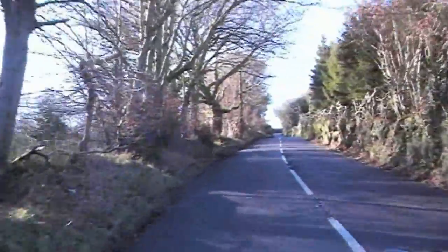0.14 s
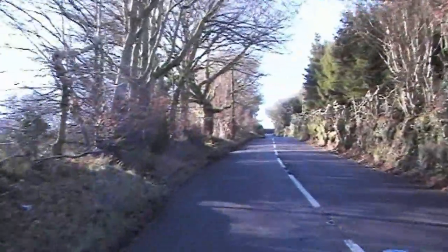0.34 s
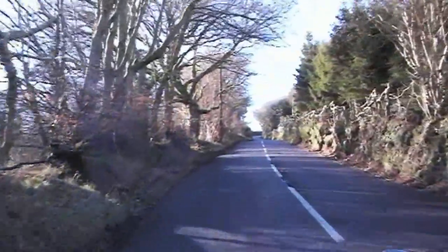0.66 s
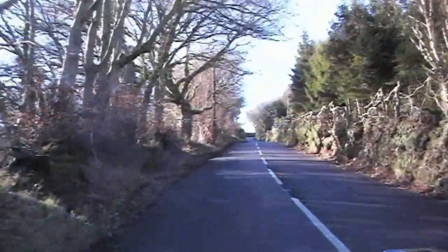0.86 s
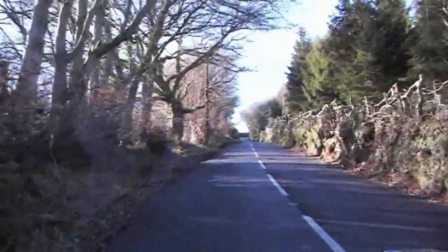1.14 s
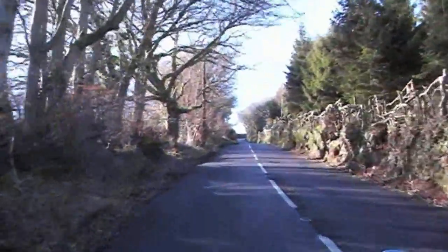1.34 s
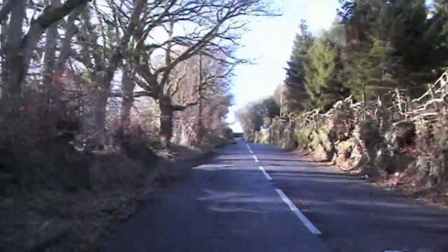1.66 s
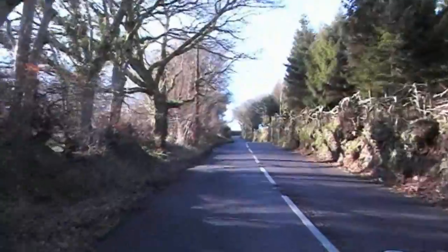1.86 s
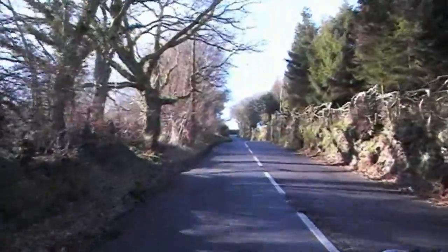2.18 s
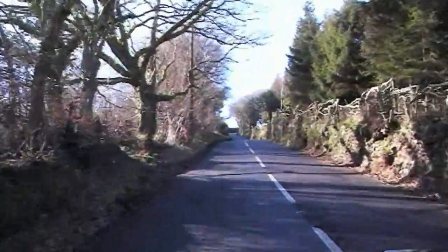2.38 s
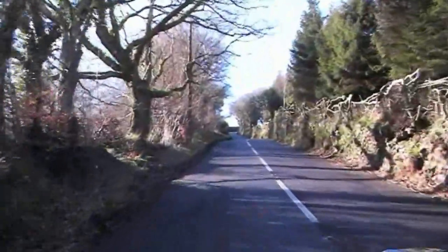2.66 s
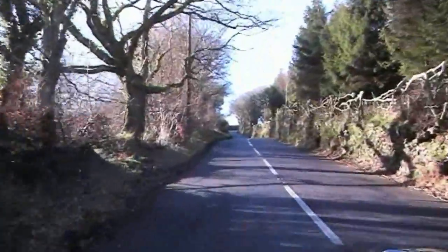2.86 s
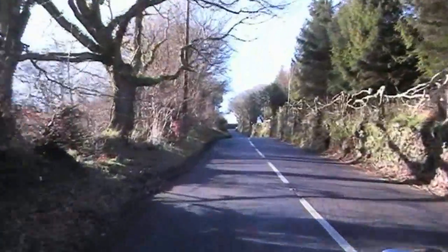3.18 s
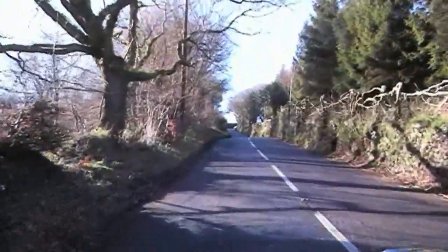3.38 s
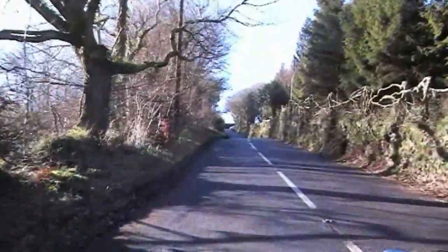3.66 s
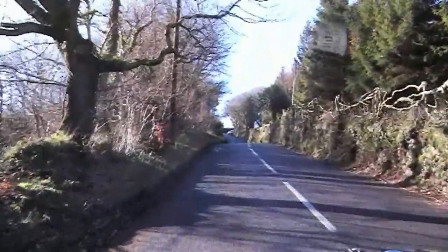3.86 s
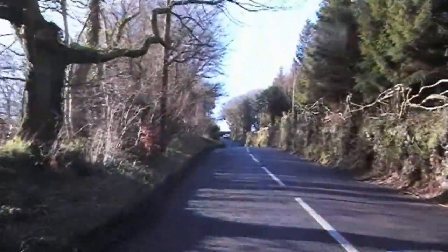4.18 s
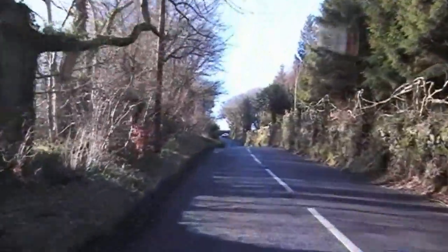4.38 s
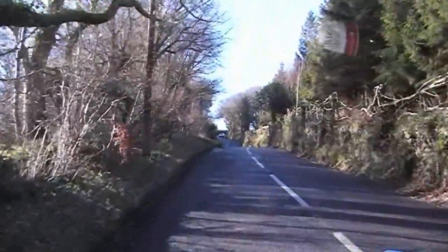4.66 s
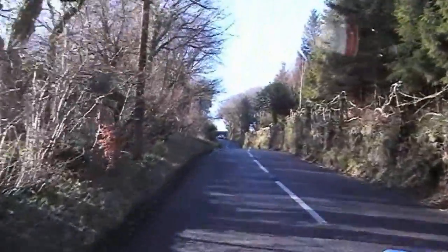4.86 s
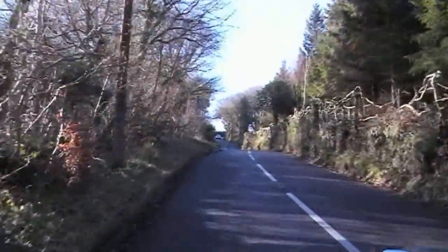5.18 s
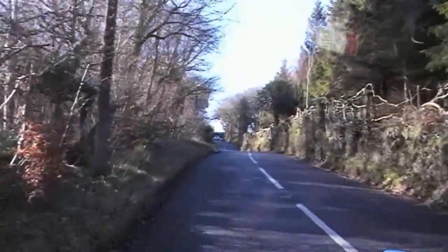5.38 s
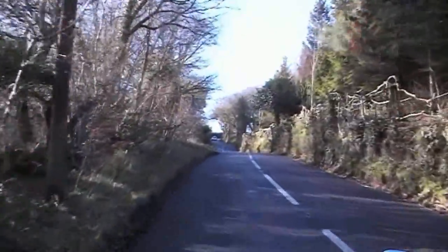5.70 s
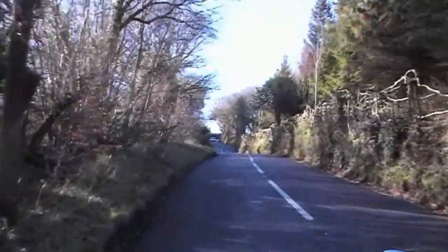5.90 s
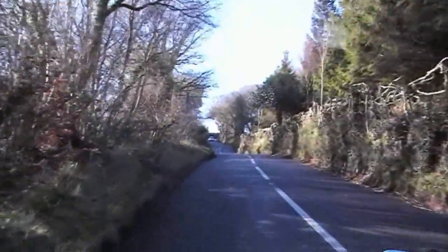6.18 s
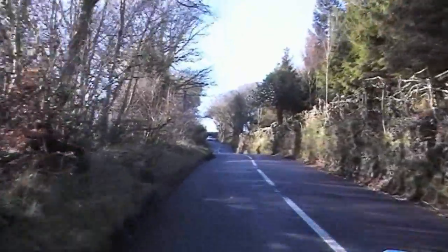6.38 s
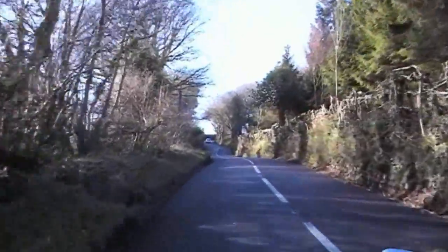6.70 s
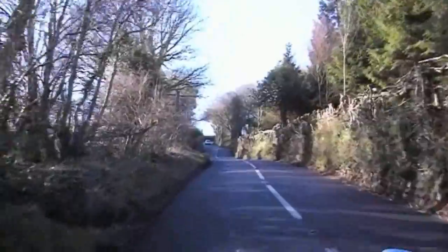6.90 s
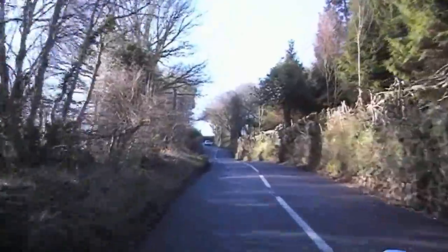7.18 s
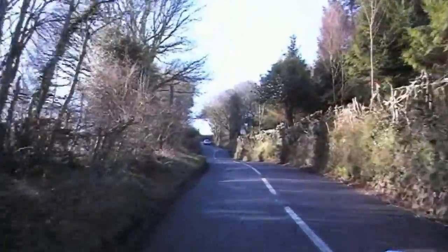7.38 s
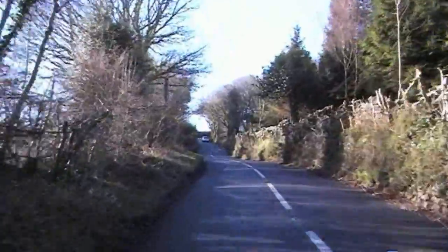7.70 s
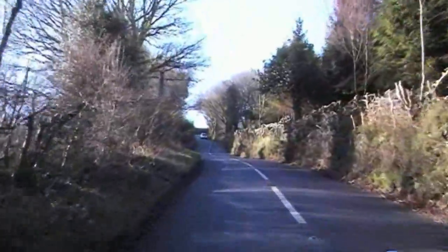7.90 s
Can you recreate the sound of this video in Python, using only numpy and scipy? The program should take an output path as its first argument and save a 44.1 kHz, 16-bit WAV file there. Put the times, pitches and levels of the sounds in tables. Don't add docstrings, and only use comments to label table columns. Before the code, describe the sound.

Inside an off-road vehicle on a country lane, a five-cylinder turbodiesel hums and clatters at steady cruising speed. A thin turbo whistle sinks slightly, then climbs as the engine pulls harder after about five seconds. Tyre roar, wind hiss and low bumps fill the cabin, caught close by a stereo microphone on the dashboard.

```python
import sys
import numpy as np
from scipy import signal
from scipy.fft import rfft, irfft, next_fast_len
from scipy.io import wavfile

SR = 44100
rng = np.random.default_rng(int(sys.argv[2]) if len(sys.argv) > 2 else 0)


def pcm_store(signal):
    levels = np.round(np.clip(np.atleast_2d(signal), -1, 1) * 32767)
    wavfile.write(sys.argv[1], SR, levels.astype(np.int16).T)


def ratio(d):
    e = np.asarray(d, float) / 20
    return 10 ** e


N = 355005

# time in seconds, engine load from 0 to 1.
THROTTLE = [
    (0, .15),
    (.75, .15),
    (1.5, 0),
    (5.15, 0),
    (5.45, .7),
    (6, .9),
    (6.6, 1),
    (8.05, 1),
]
# time in seconds, crank speed in rpm.
CRANK_SPEED = [(0, 2086), (1, 2080), (1.5, 2067), (2, 2052), (2.5, 2046), (3.5, 2048), (4, 2056),
               (4.75, 2043), (5.25, 2060), (5.5, 2071), (5.75, 2096), (6, 2136), (6.25, 2166), (6.5, 2178),
               (7.25, 2268), (7.5, 2288), (7.75, 2328), (8.05, 2359)]
# time in seconds, shaft rate in Hz.
SHAFT_SPEED = [(0, 1783), (.4, 1786), (.8, 1780), (1.6, 1749), (2.2, 1739), (3.3, 1729), (4.4, 1712),
               (4.8, 1722), (5.2, 1745), (5.48, 1790), (5.9, 1904), (6.15, 1954), (6.3, 1980), (6.75, 1999),
               (6.9, 2013), (7.2, 2064), (7.85, 2178), (8.05, 2201)]

# multiple of the four-stroke cycle, then rms level in dB cruising, at light load, pulling.
ENGINE_ORDERS = [(9, -51, -47, -39), (7, -44, -49, -38), (8, -42, -41, -47), (32, -47, -43, -42),
                 (12, -41, -37, -43), (13, -46, -42, -38), (14, -45, -36, -39), (15, -36, -33, -35),
                 (16, -44, -38, -38), (17, -37, -34, -36), (19, -50, -45, -39), (20, -42, -41, -32),
                 (21, -39, -36, -31), (22, -35, -39, -39), (23, -40, -36, -40), (24, -50, -48, -32),
                 (25, -42, -43, -35), (28, -40.5, -36, -41), (30, -49, -44, -38), (31, -41, -44, -44),
                 (35, -35.5, -34, -34), (29, -52, -47, -37), (40, -54, -52, -43), (44, -42, -35, -39),
                 (55, -33, -43, -44), (60, -43, -51, -47), (18, -45, -39, -41), (38, -54, -44, -42),
                 (54, -44, -36, -48)]
# centre in Hz, width in Hz, lift or dip under load in dB.
CABIN_MODES = [(268, 30, 3), (291, 14, -9), (330, 12, -6), (385, 50, 3), (450, 40, 5), (485, 20, -8),
               (632, 30, 6), (675, 25, -6), (770, 30, 14)]
# centre in Hz, width in Hz, lift in dB.
FLOOR_MODES = [(93.25, 8.8, 12), (97.5, 3, 5)]
# centre in Hz, width in Hz, level in dB.
EXHAUST_MODES = [(171.8, 10.6, -32.5), (188.3, 2.7, -28.5), (194.7, 5.5, -20.5)]
# centre in Hz, width in Hz, level in dB.
BLOCK_MODES = [(610, 190, -19), (782, 33, -14.5), (910, 31, -17), (1073, 110, -16), (1237, 160, -13.5),
               (1468, 85, -4), (1521.5, 63, 0), (1640, 38, -7), (1812, 32, -3.5), (2130, 45, -13),
               (2210, 41, -12), (2893, 225, -20)]
# centre in Hz, width in Hz, level in dB.
COVER_MODES = [(1523, 42, -8), (1531, 18, 2)]
# centre in Hz, width in Hz, lift in dB.
GEARBOX_MODES = [(882, 22, 3.5), (951, 14, 8)]
# centre in Hz, width in Hz, level in dB.
DUCT_MODES = [(1712, 40, -26), (1771, 10, -34), (1796.5, 10, -18), (1808.5, 15.5, -19), (1874, 20, -24.5),
              (1963.5, 29, -29), (2040, 26, -28.5), (2096, 32, -35.5), (2135.5, 17, -31.5), (2185, 45, -29)]
# centre in Hz, width in Hz, lift in dB.
BLADE_DUCT_MODES = [(10740, 180, 12), (11250, 500, 16), (12200, 600, 10), (12900, 500, 11), (13200, 400, 9)]

# frequency in Hz, density in dB per Hz.
ROAR_COLOUR = [(12, -58), (20, -25), (87, -11), (166, 1), (214, -6), (376, -3.5), (663, -6.5), (871, -2.5),
               (1190, -8.5), (1500, -2.5), (1780, -2.5), (2010, -16.5), (3000, -18.5), (3900, -36),
               (6600, -120)]
# frequency in Hz, density in dB per Hz.
WIND_COLOUR = [(1180, -52), (2000, -6.5), (2140, -9), (2310, -6.5), (2870, -8.5), (3450, -7.5),
               (4410, -6.5), (5380, -2.5), (5720, -6.5), (6770, -5), (9060, -11), (12500, -33),
               (16200, -57), (22000, -120)]
# centre in Hz, width in Hz, level in dB.
DASH_MODES = [(3885, 77, -7.5), (4750, 48, -1.5), (5366, 65, -0.5), (6054, 56, -4.5), (6720, 120, -6.5),
              (8030, 45, -6.5), (9110, 62, -13.5)]
# middle in seconds, half length in seconds, extra roar in dB.
COARSE_ASPHALT = [
    (.3, 1.2, 1.1),
    (4.12, .15, 1.5),
]
# time in seconds, extra rumble in dB.
ROAD_BUMPS = [
    (0.05, 6),
    (1.55, 5),
    (2.44, 8),
    (3.07, 5),
    (4.06, 13),
    (4.4, 5),
    (5.6, 4),
    (6.2, 3),
    (7.29, 5),
]

# frequency in Hz, gain in dB.
MIC_COLOUR = [(9000, 0), (12400, 2), (13250, 14), (13400, 9), (13750, 9), (13900, -12), (14500, -18)]
# frequency in Hz, level in dB.
PORT_SIDE = [(60, -30), (130, -29), (250, -15.5), (500, -19), (1000, -17), (1400, -25.5), (2200, -16.5),
             (3500, -11), (5300, -14), (6400, -7.5), (7400, 0), (9000, -6), (11000, -3.5), (13000, -4)]
# frequency in Hz, share from 0 to 1.
PORT_LEAD = [(5500, 0.1), (6800, 0), (7300, 0.4), (9000, 0.5), (11000, .2)]

# cruising level in dB, rise at full load in dB, rise per 100 rpm in dB.
CLATTER_LAW, ROAR_LAW = (-23.5, -0.76, 1.23), (-21.5, 2.44, 0.1)
WIND_LAW, RUMBLE_LAW = (-26, .6, 0.22), (-49.5, 3, 3)

CRUISE_RPM, LIGHT_LOAD = 2050, .15
GEAR_RATIO = 50.6


def curve(table):
    seconds, *columns = np.transpose(table)
    t = np.arange(N) / SR
    return [np.interp(t, seconds, column) for column in columns]


def walk(rate_hz, step=1):
    levels = rng.standard_normal(400)
    return np.interp(np.arange(0, N, step) * rate_hz / SR, np.arange(len(levels)), levels)


def swell(rows):
    t = np.arange(N) / SR
    return sum(db * np.exp(-((t - middle) / half) ** 2) for middle, half, db in rows)


def law(rule, rpm, load):
    cruise_db, load_db, speed_db = rule
    return cruise_db + load_db * load + speed_db * (rpm - CRUISE_RPM) / 100


def by_load(load, cruise_db, light_db, pull_db):
    return np.interp(load, [0, LIGHT_LOAD, 1], [cruise_db, light_db, pull_db])


def lift(x, peaks):
    return sum(db / (1 + (2 * (x - centre) / width) ** 2) for centre, width, db in peaks)


def through(hz, modes, leak_db):
    gain = sum(ratio(db) / (1 + 2j * (hz - centre) / width) for centre, width, db in modes)
    return 10 * np.log10(np.abs(gain) ** 2 + ratio(leak_db) ** 2)


def unit(x):
    return x / np.sqrt(np.mean(x ** 2))


def tone(turns, db):
    return np.sqrt(2) * ratio(db) * np.sin(2 * np.pi * turns)


def shape(x, colour):
    size = next_fast_len(N)
    log_hz = np.log(np.arange(size // 2 + 1) * SR / size + 1)
    hz, db = np.transpose(colour)
    gain = ratio(np.interp(log_hz, np.log(hz + 1), db))
    return irfft(rfft(x, size) * gain, size)[:N]


def ring(x, modes):
    out = 0
    for k, (hz, width, db) in enumerate(modes):
        b, a = signal.iirpeak(hz, hz / width, SR)
        out = out + (-1) ** k * ratio(db) * signal.lfilter(b, a, x)
    return out


def ports(mid):
    size = next_fast_len(N)
    hz = np.arange(size // 2 + 1) * SR / size
    lead = np.clip(np.interp(hz, *np.transpose(PORT_LEAD)), 0, 1)
    spectrum = rfft(mid, size)
    scrambled = np.abs(spectrum) * np.exp(2j * np.pi * rng.random(len(lead)))
    side = lead * np.exp(1.3j) * spectrum + np.sqrt(1 - lead ** 2) * scrambled
    return shape(irfft(side, size)[:N], PORT_SIDE)


def echoes(x, t60=0.052, wet_db=-10.0):
    t = np.arange(SR // 10) / SR
    tail = rng.standard_normal(len(t)) * 1000. ** (-t / t60)
    tail *= ratio(wet_db) / np.sqrt(np.sum(tail ** 2))
    return x + signal.oaconvolve(x, tail)[:N]


def wind(turns, wind_db, throb=0.036, dash_db=-6.5):
    air = unit(shape(rng.standard_normal(N), WIND_COLOUR))
    panels = ratio(dash_db) * unit(ring(rng.standard_normal(N), DASH_MODES))
    pulse = 1 + throb * np.cos(2 * np.pi * 5 * turns)
    return unit(echoes(air + panels)) * pulse * ratio(wind_db + 0.32 * walk(2.25))


def road(roar_db, rumble_db):
    roar_db = roar_db + swell(COARSE_ASPHALT) - 2
    roar = unit(shape(rng.standard_normal(N), ROAR_COLOUR)) * ratio(roar_db + 0.44 * walk(2.68))
    bump_half_s = .1
    rumble_db = rumble_db + swell([(s, bump_half_s, db) for s, db in ROAD_BUMPS])
    floor = ring(ring(rng.standard_normal(N), [(62, 30, 0)]), [(58, 40, 0)])
    return roar + unit(floor) * ratio(rumble_db - 6)


def gear(cycle_hz, turns, load, beside_db=-5.5, idle_db=-7.0):
    db = -35.5 + 2 * load + lift(GEAR_RATIO * cycle_hz, GEARBOX_MODES)
    order = tone(50 * turns, db + beside_db + idle_db * (1 - load))
    return tone(GEAR_RATIO * turns, db + 1.9 * walk(9)) + order


def turbo(load, flutter_db=1.2, wobble_hz=1.5, blade_flutter_db=2.4, drift_db=.8):
    hz = curve(SHAFT_SPEED)[0]
    turns = np.cumsum(hz + wobble_hz * walk(25)) / SR
    blade_db = -70 + lift(6 * hz, BLADE_DUCT_MODES) + blade_flutter_db * walk(14)
    blades = tone(6 * turns, blade_db)
    whistle_db = through(hz, DUCT_MODES, leak_db=-48)
    whistle_db = whistle_db + lift(load, [(LIGHT_LOAD, .12, 4.3)])
    return tone(turns, whistle_db + flutter_db * walk(30) + drift_db * walk(8)) + blades


def tappet(turns, rpm, angle=.55, scatter_db=2.0):
    when = np.arange(int(turns[-1])) + angle
    at = np.interp(when, turns, np.arange(N)).astype(int)
    taps = np.zeros(N)
    taps[at] = ratio(scatter_db * rng.standard_normal(len(when)))
    buzz_db = lift(rpm, [(2100, 21, 13)])
    return unit(ring(taps, COVER_MODES)) * ratio(-35.5 + buzz_db)


def clatter(turns, load, count=60, knock_db=8.0, scatter_db=1.5, slip=0.00022, rough_db=-3.0,
            rough_load_db=0.0):
    angle = np.r_[np.arange(5) / 5, rng.random(count)]
    size = np.r_[np.full(5, ratio(knock_db)), rng.standard_normal(count)]
    chance = rng.standard_normal((int(turns[-1]) + 1, len(angle), 2))
    when = (np.arange(len(chance))[:, None] + angle + slip * chance[..., 0]).ravel()
    size = (size * ratio(scatter_db * chance[..., 1])).ravel() * (when < turns[-1])
    at = np.interp(when, turns, np.arange(N))
    ticks = np.zeros(N + 1)
    np.add.at(ticks, at.astype(int), size * (1 - at % 1))
    np.add.at(ticks, at.astype(int) + 1, size * (at % 1))
    rough = ratio(rough_db + rough_load_db * load) * rng.standard_normal(N)
    return unit(ring(unit(ticks[:N]) + rough, BLOCK_MODES))


def hum(cycle_hz, turns, load, wander_db=1.1, wander_rate=6.):
    cycle_hz, turns, load = (c[::8] for c in (cycle_hz, turns, load))
    firing_db = by_load(load, -50, -45.5, -40) + lift(5 * cycle_hz, FLOOR_MODES)
    octave_db = through(10 * cycle_hz, EXHAUST_MODES, leak_db=-58)
    out = tone(5 * turns, firing_db)
    out += tone(10 * turns + .3, octave_db + walk(12, step=8))
    for order, *levels_db in ENGINE_ORDERS:
        order = np.round(order)
        cabin_db = lift(order * cycle_hz, CABIN_MODES)
        cabin_db -= np.mean(cabin_db[-len(load) // 3:])
        db = by_load(load, *levels_db) + load * cabin_db
        phase = rng.random()
        out += tone(order * turns + phase, db + wander_db * walk(wander_rate, step=8))
    return signal.resample_poly(out, 8, 1)[:N]


def scene():
    rpm, load = curve(CRANK_SPEED)[0], curve(THROTTLE)[0]
    cycle_hz = rpm / 120
    turns = np.cumsum(cycle_hz) / SR
    noise = road(law(ROAR_LAW, rpm, load), law(RUMBLE_LAW, rpm, load))
    noise += wind(turns, law(WIND_LAW, rpm, load))
    noise += tappet(turns, rpm)
    noise += clatter(turns, load) * ratio(law(CLATTER_LAW, rpm, load))
    noise = shape(noise, MIC_COLOUR)
    engine = hum(cycle_hz, turns, load) + gear(cycle_hz, turns, load)
    pan = np.array([[.5], [-.5]])  # left, right; times the level difference in dB
    mix = noise + 2 * pan * ports(noise)
    return mix + engine * ratio(pan * 0.4) + turbo(load) * ratio(pan * 1.6)


def low_pass(x):
    return signal.sosfilt(signal.butter(12, 14360, fs=SR, output="sos"), x)


def record(dry):
    return low_pass(dry)


dry = scene()
out = record(dry)
pcm_store(out)
```